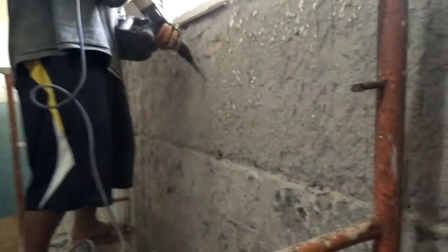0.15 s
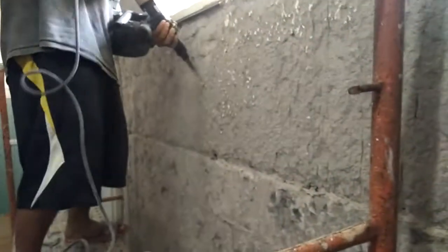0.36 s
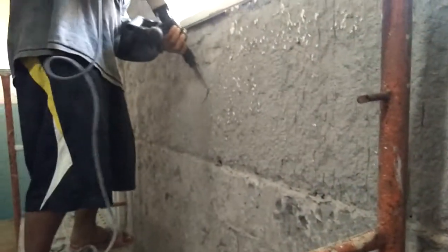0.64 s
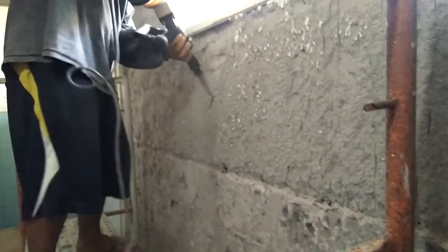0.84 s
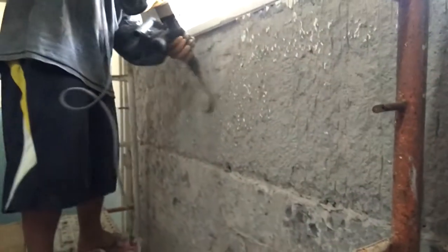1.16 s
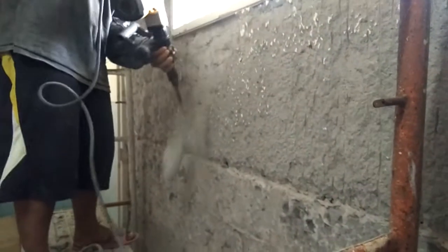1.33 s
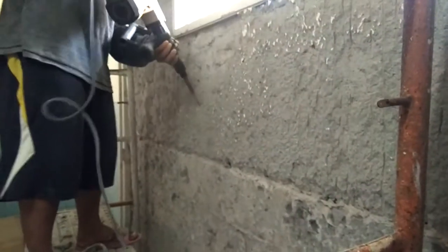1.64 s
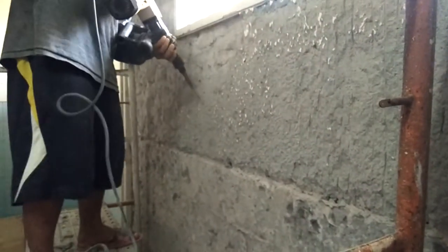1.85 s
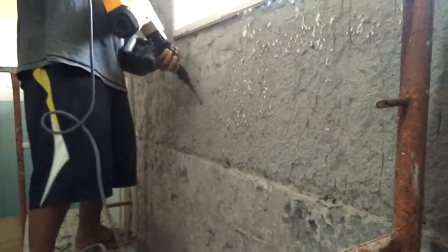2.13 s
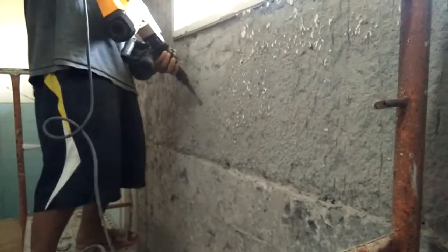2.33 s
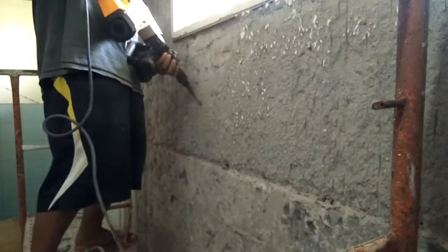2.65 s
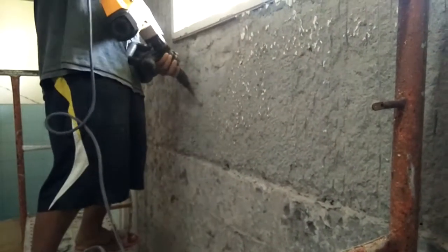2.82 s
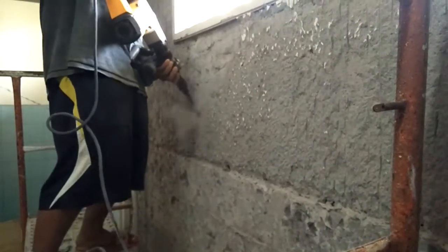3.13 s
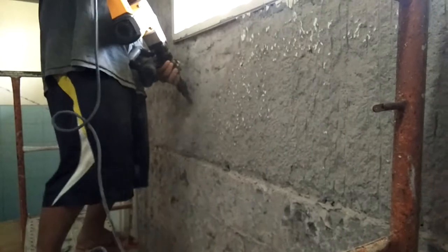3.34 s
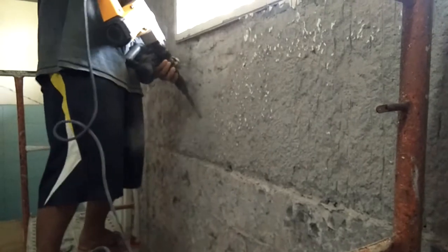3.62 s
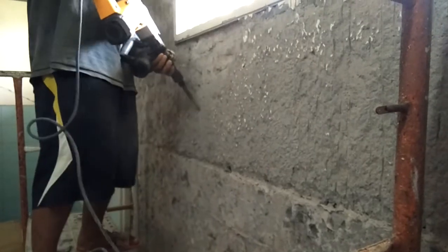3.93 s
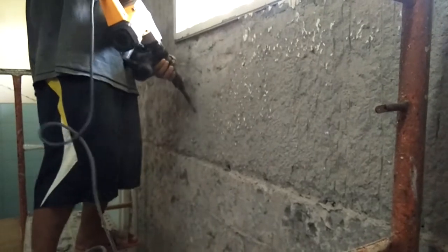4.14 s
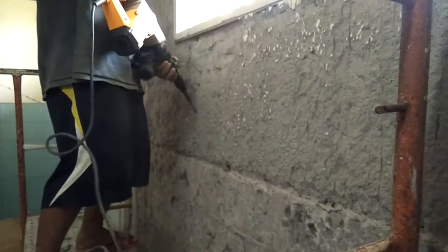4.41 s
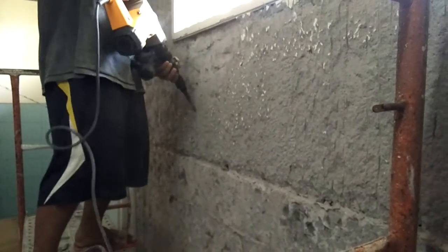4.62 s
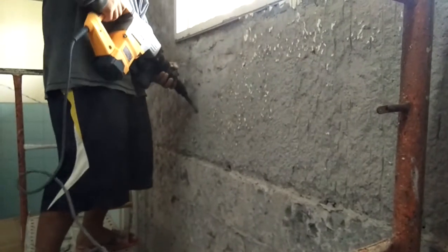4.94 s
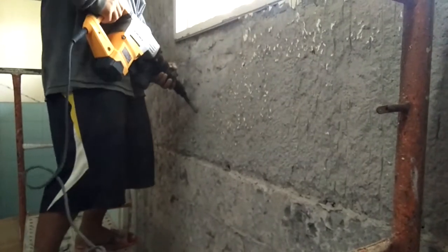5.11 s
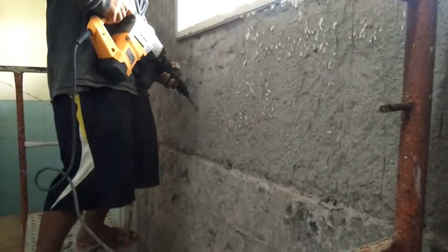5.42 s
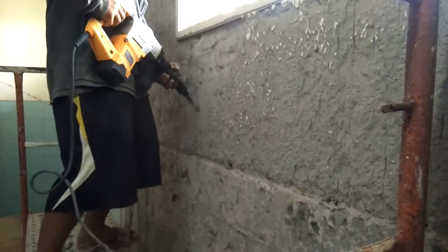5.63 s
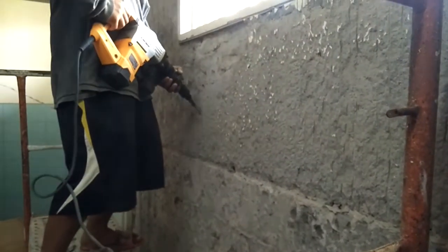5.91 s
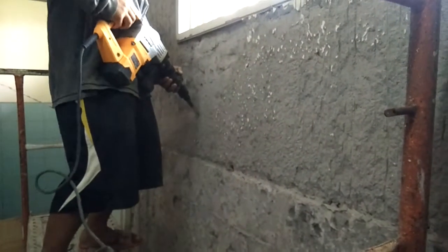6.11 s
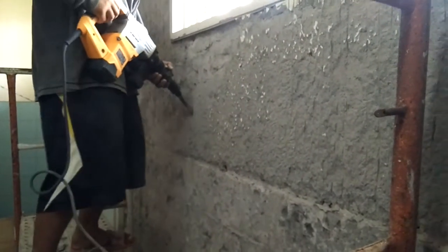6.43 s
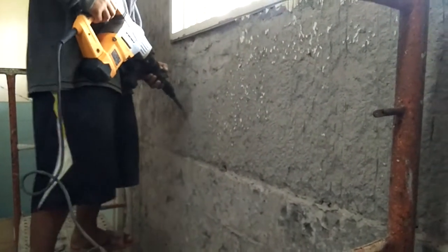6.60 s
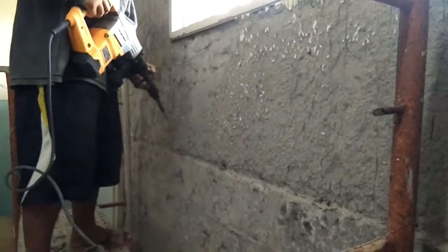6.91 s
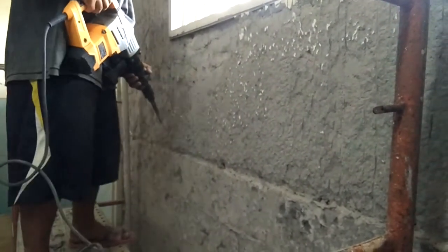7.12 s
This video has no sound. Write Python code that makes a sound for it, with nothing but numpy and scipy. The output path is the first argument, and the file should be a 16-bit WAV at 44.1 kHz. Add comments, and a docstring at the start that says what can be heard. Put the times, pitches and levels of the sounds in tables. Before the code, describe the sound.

Three runs of rapid, gritty chiselling on concrete by a power hammer, steel ringing high, separated by fading motor whir, clinks and falling crumbs.

```python
"""In a bare, echoing room an electric demolition hammer chisels render off a concrete wall in three runs.
Blows gate coloured noise (mortar, splinters, steel) and excite the modes of wall and chisel.
Between runs fan and gear noise fades as the motor coasts, the bit knocks and clinks, and grit crumbles.
Lumps of low noise are puffs of air on the microphone, over a faint rumble and a wavering drone."""
import sys
import numpy as np
from scipy import signal
from scipy.fft import rfft, irfft
from scipy.io import wavfile
from scipy.ndimage import uniform_filter1d

SR = 44100
rng = np.random.default_rng(int(sys.argv[2]) if len(sys.argv) > 2 else 0)


def store_pcm(level_fs):
    """Save levels as 16-bit WAV."""
    pcm = np.round(np.clip(level_fs, -1, 1) * 32767).astype(np.int16)
    wavfile.write(sys.argv[1], SR, np.atleast_2d(pcm).T)


N = 320166
TIME = np.arange(N) / SR

# Levels in the tables are relative: the functions add their own trims.
# Runs of the hammer. Each row: motor start, bit seating, bit lift, end of crushing and fan stall
# in seconds, levels of mortar, steel and fan in dB, gears against the fan in dB.
RUNS = [(-0.2, -0.1, 0.865, 0.98, 1.475, -18.5, -17.5, -25, -11),
        (2.469, 2.567, 3.635, 3.644, 4.19, -20, -18, -25.5, -28),
        (4.977, 5.062, 6.445, 6.52, 7.15, -19.5, -17.5, -24, -13.5)]
# Spectrum of the steel clatter. Each row: frequency in Hz, density in dB per Hz.
STEEL_SPECTRUM = [(5500, -2), (7400, -2), (8300, 2), (10000, 6.5), (11000, -3), (11500, 0), (12000, -7),
                  (13000, -33), (14300, -30), (15200, -17), (15500, -16)]
# Broad wall resonances. Each row: frequency in Hz, level in dB, T60 in seconds.
WALL_MODES = [(1567, -23, 0.026), (1888, -16, 0.029), (2180, -16.5, 0.011), (2690, -16.5, 0.0058),
              (3500, -24, 0.004)]
SPIN_UP_S = 0.071


def hammer(mortar_db=0.24, splinter_db=-5, steel_db=0.9, modes_db=3.0, wall_db=-2,
           crush_s=0.0029, splinter_s=0.0036, clatter_s=0.004, chatter_s=0.038):
    """Every blow crushes and splinters mortar, stirs the wall, rattles the tool holder, rings the chisel."""
    # Crushed mortar. Each row: frequency in Hz, density in dB per Hz.
    mortar_spectrum = [(50, -14), (75, 4), (110, -8.5), (190, -7.5), (320, -2), (440, -7.5), (700, -7.5),
                       (1100, -3.5), (1550, -2), (2400, -1), (3300, -4.5), (5200, -13), (7300, -12),
                       (9500, -23)]
    # Splintering aggregate. Each row: frequency in Hz, density in dB per Hz.
    splinter_spectrum = [(2800, -4), (3700, -2.5), (5500, -2.5), (7200, -5.5)]
    # Chisel modes. Each row: frequency in Hz, level in dB, T60 in seconds.
    chisel_modes = [(5248, -27, .04), (5889, -26, .04), (7885, -14, .04), (9142, -14, .06),
                    (10700, -8, .012), (11420, -13, .02), (13495, -26, .035)]

    blows = striker()
    crushing, splintering, contact, sung = efforts()

    crush = noise(mortar_spectrum, grain_db=6.0) * die_away(blows, crush_s)
    crush = shifting(room(crush, wet_db=4.0))
    # which wall resonances answer changes as the bit creeps along
    wall = 0
    for hz, db, t60_s in WALL_MODES:
        mode = rms_one(ring(blows * rng.standard_normal(N), hz, t60_s))
        wall += from_db(db + 3.5 * drift(8.3)) * mode
    mortar = steady(rms_one(crush) + from_db(wall_db) * wall)

    clatter = noise(STEEL_SPECTRUM, grain_db=7.5) * die_away(blows, clatter_s)
    clatter = steady(room(clatter, wet_db=0.5), window_s=0.046)
    splinters = noise(splinter_spectrum, grain_db=6.5) * die_away(blows, splinter_s)
    splinters = steady(room(splinters, wet_db=-0.5), window_s=0.059)

    chatter = die_away(blows, chatter_s)
    modes = 0
    for hz, db, t60_s in chisel_modes:
        mode = steady(ring(chatter * rng.standard_normal(N), hz, t60_s), window_s=0.08)
        modes += from_db(db + 4.4 * drift(8)) * mode

    return (crushing * from_db(mortar_db) * mortar
            + splintering * from_db(splinter_db) * splinters
            + contact * (from_db(steel_db) * clatter + from_db(modes_db) * modes)
            + chisel_tone(blows, crushing, contact, sung))


def striker(blows_per_s=67, unevenness_db=3.5, bounce=0.14, speed_wander=0.1):
    """One click per piston stroke; the bit bounces, so timing and strength vary about the mean."""
    rate = blows_per_s * (1 + bounce * drift(60) + speed_wander * drift(5))
    strokes = np.floor(np.cumsum(rate) / SR)
    strength = from_db(unevenness_db * np.clip(rng.standard_normal(N), -2, 2))
    return np.abs(np.diff(strokes, prepend=0)) * strength


def efforts(tone_db=1.0, sway_db=1.03, seating_s=0.008, usual_ringing_db=-21,
            dig_mortar=0.3, dig_splinters=0.92, dig_steel=0.15,
            mortar_fall_db_per_s=110, steel_fall_db_per_s=146, tone_fall_db_per_s=170):
    """Gains of crushing, splintering, steel contact and chisel tone; a bit that digs in rings less.

    The dig_ settings are dB gained (steel: lost) per dB of ringing below usual.
    """
    # Main chisel tone, one table per run. Each row: time in seconds, level in dB.
    ringing_tables = [
        [(0.02, -20.5), (0.15, -22), (0.42, -19), (0.68, -24), (0.79, -22.5), (0.93, -22)],
        [(2.59, -18), (2.82, -20.5), (3.07, -28.5), (3.17, -15.5), (3.31, -15.5), (3.38, -21), (3.5, -13.5),
         (3.68, -27), (3.79, -26)],
        [(5.08, -17.5), (5.38, -20.5), (5.52, -33), (5.59, -19.5), (5.93, -24), (6.3, -17.5), (6.4, -18.5),
         (6.52, -11)],
    ]
    crushing, splintering, contact, sung = 0, 0, 0, 0
    for run, ringing in zip(RUNS, ringing_tables):
        start, seats, lifts, ends, _, mortar_db, steel_db, _, _ = run
        s, db = np.transpose(ringing)
        ringing_db = np.interp(TIME, s, db)
        dig_db = (usual_ringing_db - ringing_db) * (TIME < ends)

        pounding = from_db(mortar_db) * gate(start, ends, SPIN_UP_S, mortar_fall_db_per_s)
        crushing += pounding * from_db(dig_mortar * dig_db)
        splintering += pounding * from_db(dig_splinters * dig_db)
        touching = gate(seats, lifts, seating_s, steel_fall_db_per_s)
        contact += from_db(steel_db - dig_steel * dig_db) * touching
        sung += from_db(ringing_db + tone_db) * gate(seats, s[-1], seating_s, tone_fall_db_per_s)
    return crushing, splintering, contact * from_db(sway_db * drift(20)), sung


def chisel_tone(blows, crushing, contact, sung, tone_hz=10612, throb_db=4.5, choke=0.15, jolt_rad=1.8):
    """The least damped mode: hard contact chokes it and jolts its phase; left alone it sings on purely."""
    free = sung * sung / (sung + choke * (contact + crushing) + 1e-9)
    force = np.minimum(contact / np.percentile(contact, 75), 1)
    jolts = jolt_rad * np.cumsum((blows > 0) * force * rng.standard_normal(N))
    tone = np.sqrt(2) * np.sin(2 * np.pi * tone_hz * TIME + jolts)
    return free * tone * from_db(throb_db * force * drift(60))


def shifting(x, patchy_db=2.0, count=5):
    """Each spot of mortar breaks with its own colour: the bands swell and sink separately."""
    out, rest = 0, x
    for hz in np.geomspace(600, 7000, count):
        band = signal.sosfiltfilt(signal.butter(2, hz, fs=SR, output="sos"), rest)
        out = out + band * from_db(patchy_db * drift(30))
        rest = rest - band
    return out + rest


def bites(bite_db=-6, decay_s=0.013):
    """Bright cracks of steel on steel when the bit finds solid wall: decaying bursts of noise."""
    # Hard blows as the bit bites afresh. Each row: start in seconds, level in dB.
    bite_rows = [(0.9428, -7), (0.956, -8), (1.04, -11), (2.533, -6.5), (2.578, -11), (3.583, -12),
                 (5.061, -8), (6.2474, -13), (6.3371, -8)]
    strength = sum(from_db(db + bite_db) * burst(s, decay_s) for s, db in bite_rows)
    return room(strength * noise(STEEL_SPECTRUM, grain_db=-6.0), wet_db=-7.0)


def coasting(fan_db=0.5, gear_hz=1505, gear_t60_s=0.06, coast_fall_db_per_s=14.5, stall_fall_db_per_s=168):
    """Fan rush and resonant gear rasp: they fade slowly as the motor coasts, then fast once it stalls."""
    # Cooling fan. Each row: frequency in Hz, density in dB per Hz.
    fan_spectrum = [(120, -45), (200, -5), (244, -9.5), (378, -11), (488, -10), (554, -14), (630, -3.5),
                    (1190, -4.5), (1540, -2), (1740, -2.5), (3240, -7.5), (6350, -1.5), (10400, -5),
                    (11800, -13.5), (15500, -18)]
    gears = rms_one(ring(rng.standard_normal(N), gear_hz, gear_t60_s))
    fan = from_db(fan_db) * noise(fan_spectrum, grain_db=4.0)
    out = 0
    for start, _, _, ends, stalls, _, _, db, gears_db in RUNS:
        slowing = from_db(db - coast_fall_db_per_s * np.maximum(TIME - ends, 0))
        running = slowing * gate(start, stalls, SPIN_UP_S, stall_fall_db_per_s)
        out += running * (fan + from_db(gears_db) * gears)
    return out


def knocks(body_db=-5, wall_db=1, grit_db=-8, crack_db=-6, crack_s=0.0034, crumble_s=0.017):
    """A crack and a thud, then crumbling grit; the wall answers with its resonances."""
    # Bit and chunks on the wall. Each row: start in seconds, level in dB,
    # treble and thud against the body in dB.
    knock_rows = [(0.9434, -10.5, -1, -20), (1.041, -12, -1, -22), (1.2964, -17, -2, -14),
                  (1.3736, -22.5, -4, -15), (1.634, -22, -4, -6), (1.7674, -13.5, 10.5, -20),
                  (1.777, -11.5, 0, -24), (1.796, -8.5, -11, -20), (1.808, -17.5, 7.5, -22),
                  (1.9594, -31, 11, -17), (2.045, -22.5, -1, -10), (2.1796, -28, 9, -11),
                  (2.218, -25, 2, -6.5), (3.6466, -5.5, 4.5, -31), (3.6764, -9, -8, -38),
                  (4.159, -21, 2, -14), (4.2385, -27.5, 1.5, -13), (4.483, -37.5, -5, -11),
                  (4.595, -32, 2, -0.5), (4.7223, -29, -6, -10), (4.8227, -30.5, -2, -12),
                  (4.88, -39, 6, -8), (6.561, -6.5, -7, -32), (6.579, -23.5, -18, -27),
                  (7.1793, -40.5, 21, -15)]
    # Chunks. Each row: frequency in Hz, density in dB per Hz.
    chunk_spectrum = [(150, -25), (400, -23), (750, -23), (1200, -10), (2000, 3), (2800, 2.5), (3900, -1.5),
                      (5000, -6.5), (7000, -9)]
    # Crumbling grit. Each row: frequency in Hz, density in dB per Hz.
    grit_spectrum = [(4000, -10), (5300, -8.5), (6500, -1.5), (8000, -6.5), (10500, -7), (12000, -19),
                     (15500, -26)]
    # Dull thud of a heavy chunk. Each row: frequency in Hz, density in dB per Hz.
    thud_spectrum = [(400, -6.5), (800, -3.5), (1400, -1)]

    body, bright, heavy = np.zeros((3, N))
    for s, db, treble_db, thud_db in knock_rows:
        crumble = burst(s, crumble_s, rise_s=0.0036)
        hit = from_db(db) * (crumble + from_db(crack_db) * burst(s, crack_s))
        body += hit
        bright += hit * from_db(treble_db)
        heavy += hit * from_db(thud_db)

    drive = body * rng.standard_normal(N)
    wall = sum(from_db(db) * resonate(drive, hz, t60_s) for hz, db, t60_s in WALL_MODES)
    chunks = from_db(body_db) * body * noise(chunk_spectrum, grain_db=3.0)
    grit = from_db(grit_db) * bright * steady(noise(grit_spectrum, grain_db=10.0), window_s=0.0076)
    thud = heavy * noise(thud_spectrum)
    return room(chunks + from_db(wall_db) * wall + grit + thud, wet_db=1.5)


def clinks(rattle_rad=1.4):
    """After a knock the loose bit and the wall ring on: decaying sines with a randomly shaken phase."""
    # Ringing notes of bit and wall. Each row: start in seconds, level in dB, frequency in Hz, T60 in seconds.
    clink_rows = [(1.805, -17.5, 1814, 0.39), (1.805, -15.5, 3600, .25), (1.96, -37, 4930, 0.57),
                  (2.18, -35, 5885, 0.36), (2.215, -35, 5885, 0.35), (4.16, -30, 1850, 0.38),
                  (4.16, -33, 2050, 0.42), (4.24, -35, 10880, 0.24), (4.485, -47, 7400, 0.33),
                  (6.26, -14, 9170, 0.59)]
    shake = rattle_rad * drift(300)
    notes = 0
    for s, db, hz, t60_s in clink_rows:
        envelope = burst(s, t60_s / np.log(1000), rise_s=0.003)
        notes += from_db(db) * envelope * np.sin(2 * np.pi * hz * TIME + shake)
    return notes


def puffs(low_db=1, uneven_db=2.0, jitter_s=0.0026, max_lumps=8,
          lump_gap_s=0.023, lump_rise_s=0.0039, lump_decay_s=0.0069):
    """Each gust is a string of uneven lumps of air that hit the microphone port directly, without echo."""
    # Gusts. Each row: start and length in seconds, level in dB, upper bass against the whole in dB.
    gust_rows = [(0.144, .01, -9, -15), (0.269, .05, -14.5, -17), (0.444, 0.056, -15, -17.5),
                 (2.662, .01, -16, -18), (3.16, .06, -5.5, 1.5), (3.274, .01, -10.5, -11),
                 (5.13, 0.047, -7, 1.5), (5.367, .01, -15, -20), (5.65, 0.097, -7, -3),
                 (6.028, 0.16, -6, -6.5)]
    low, upper = np.zeros(N), np.zeros(N)
    for s, length_s, db, upper_db in gust_rows:
        for k, (late, strong) in enumerate(rng.standard_normal((max_lumps, 2))):
            if k * lump_gap_s < length_s:
                at = s + k * lump_gap_s + jitter_s * late * (k > 0)
                lump_db = db + uneven_db * strong
                low += from_db(lump_db) * burst(at, lump_decay_s, lump_rise_s)
                upper += from_db(lump_db + upper_db) * burst(at, lump_decay_s / 2, lump_rise_s)

    low_noise = noise([(55, 2), (85, 8.5), (150, 1.5), (300, -6), (480, -12)])
    lumps = from_db(low_db) * low * steady(low_noise, window_s=0.0136)
    flutter = upper * noise([(300, -11), (700, 7), (1200, -9)])
    port = signal.butter(2, [50, 1300], "band", fs=SR, output="sos")
    return signal.sosfilt(port, lumps + flutter)


def background(rumble_db=-43.5, drone_db=-2.0, waver_rad=0.55):
    """Outdoor rumble (noise) and a drone (sines wavering in level and phase) come in through the window."""
    # Rumble. Each row: frequency in Hz, density in dB per Hz.
    rumble_spectrum = [(25, -9), (45, -6.5), (70, -3.5), (150, 0), (260, -5), (420, -9.5), (900, -17.5),
                       (1900, -15.5), (2800, -18.5), (4200, -32), (7500, -34), (10500, -34.5), (12500, -46),
                       (15000, -43)]
    # Drone partials. Each row: frequency in Hz, level in dB.
    drone_partials = [(76, -45.5), (135, -48), (242, -52)]
    drone = 0
    for hz, db in drone_partials:
        partial = np.sqrt(2) * np.sin(2 * np.pi * hz * TIME + waver_rad * drift(11))
        drone += from_db(db + drift(8)) * partial
    return from_db(rumble_db) * noise(rumble_spectrum) + from_db(drone_db) * drone


def room(x, wet_db, room_t60_s=0.6, treble_t60_s=0.35, split_hz=4500, count=3):
    """Direct sound plus the dense echo of bare walls; the echo pattern shifts as the worker moves."""
    t, echo = TIME[:SR // 2], 0
    low_pass = signal.butter(2, split_hz, fs=SR, output="sos")
    high_pass = signal.butter(2, split_hz, "high", fs=SR, output="sos")
    shares = np.array([drift(14) for _ in range(count)])
    for share in shares / np.linalg.norm(shares, axis=0):
        low = signal.sosfilt(low_pass, rng.standard_normal(len(t)))
        high = signal.sosfilt(high_pass, rng.standard_normal(len(t)))
        tail = low * from_db(-60 * t / room_t60_s) + high * from_db(-60 * t / treble_t60_s)
        tail *= t > 0.003  # gap before the first echo, s
        echo += share * signal.fftconvolve(x, tail / np.linalg.norm(tail))[:N]
    return (x + from_db(wet_db) * echo) / np.hypot(1, from_db(wet_db))


def noise(spectrum, grain_db=0):
    """Noise of the given colour and rms 1; a random level per sample, of spread grain_db, makes it gritty."""
    hz, db = np.transpose(spectrum)
    octave = np.log2(np.maximum(np.fft.rfftfreq(N, 1 / SR), 1))
    below = np.maximum(np.log2(hz[0]) - octave, 0)
    above = np.maximum(octave - np.log2(hz[-1]), 0)
    # 24 dB per octave outside the table
    gain = from_db(np.interp(octave, np.log2(hz), db) - 24 * (below + above))
    grains = rng.standard_normal(N) * from_db(grain_db * rng.standard_normal(N))
    return rms_one(irfft(rfft(grains) * gain, N))


def ring(x, hz, t60_s):
    """One mode, a two-pole resonator: a unit click sets a decaying sine of initial height 1 ringing."""
    r, w = from_db(-60 / (t60_s * SR)), 2 * np.pi * hz / SR
    return signal.lfilter([0, np.sin(w)], [1, -2 * r * np.cos(w), r * r], x + 1e-18)


def resonate(x, hz, t60_s):
    """A mode that keeps the power of the white noise driving it."""
    return ring(x, hz, t60_s) * np.sqrt(4 * np.log(1000) / (t60_s * SR))


def die_away(clicks, decay_s):
    """Each click starts an exponential envelope."""
    return signal.lfilter([1], [1, -np.exp(-1 / (decay_s * SR))], clicks + 1e-18)


def burst(s, decay_s, rise_s=0.00059):
    """Envelope of a single hit at time s: exponential rise and decay, at most half a second long."""
    out, start = np.zeros(N), int(s * SR)
    t = TIME[:min(SR // 2, N - start)]
    out[start:start + len(t)] = np.exp(-t / decay_s) * (1 - np.exp(-t / rise_s))
    return out


def gate(start, stop, rise_s, fall_db_per_s):
    """Envelope that swells from start, holds, and falls evenly in dB after stop."""
    swell = np.clip((TIME - start) / rise_s, 0, 1) ** 2
    return swell * from_db(-fall_db_per_s * np.maximum(TIME - stop, 0))


def steady(x, window_s=0.097):
    """Keep the fine texture but hold the running rms at 1."""
    power = uniform_filter1d(x * x, max(int(window_s * SR), 1))
    return x / np.sqrt(np.maximum(power, 1e-12))


def drift(rate_hz):
    """Slow random wander of rms 1: straight lines between rate_hz random knots per second."""
    knots = rng.standard_normal(int(rate_hz * N / SR) + 2)
    return rms_one(np.interp(TIME * rate_hz, np.arange(len(knots)), knots))


def rms_one(x):
    """Scale to unit rms."""
    return x / np.sqrt(np.mean(x ** 2) + 1e-20)


def from_db(db):
    """Decibels to amplitude gain."""
    return 10 ** (np.asarray(db) / 20)


def scene():
    """All sources at one microphone, the same in both channels."""
    mono = hammer() + bites() + coasting() + knocks() + clinks() + puffs() + background()
    return np.array([mono, mono])


def record(dry, ceiling=0.68, bass_hz=45, cutoff_hz=15480):
    """The small microphone loses the deepest bass, peaks are rounded and the top is cut."""
    thin = signal.sosfilt(signal.butter(2, bass_hz, "high", fs=SR, output="sos"), dry)
    rounded = ceiling * np.tanh(thin / ceiling)
    return signal.sosfilt(signal.ellip(12, 0.1, 90, cutoff_hz, fs=SR, output="sos"), rounded)


dry = scene()
out = record(dry)
store_pcm(out)
```